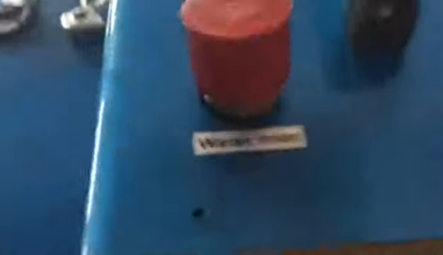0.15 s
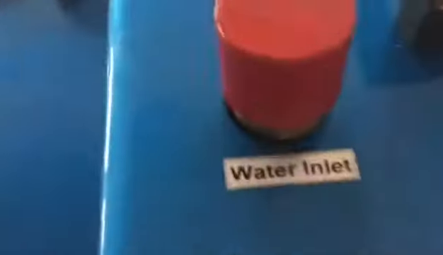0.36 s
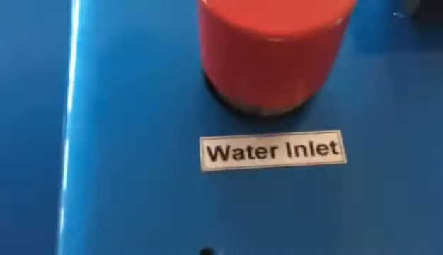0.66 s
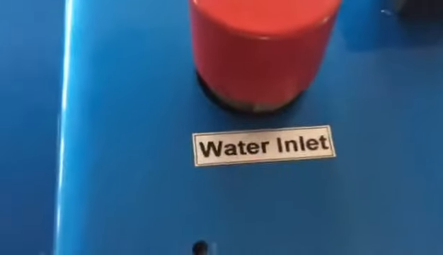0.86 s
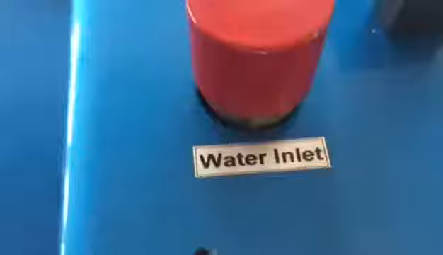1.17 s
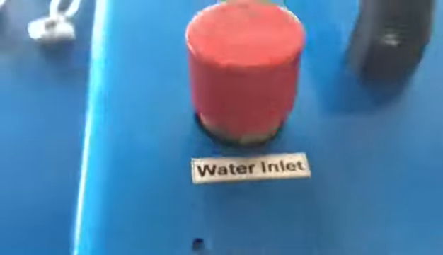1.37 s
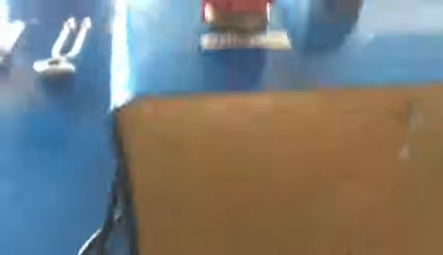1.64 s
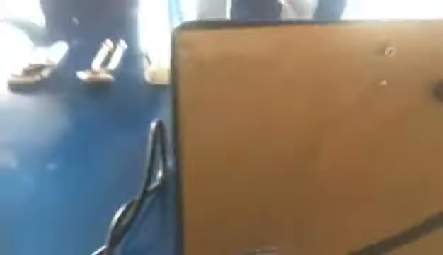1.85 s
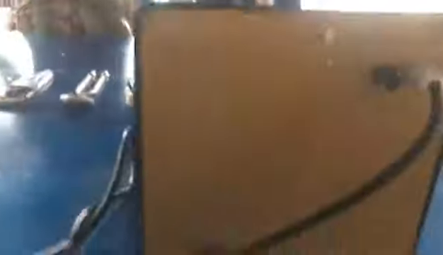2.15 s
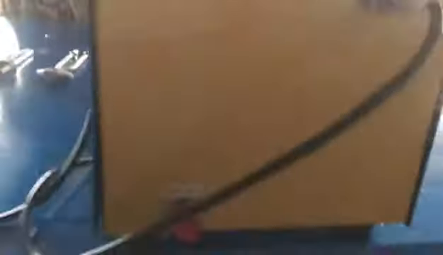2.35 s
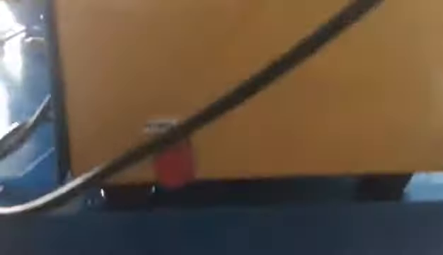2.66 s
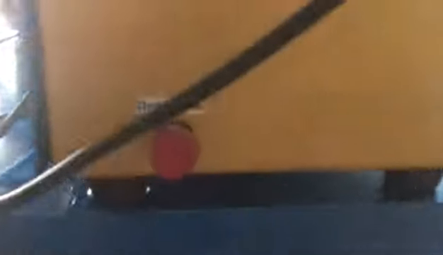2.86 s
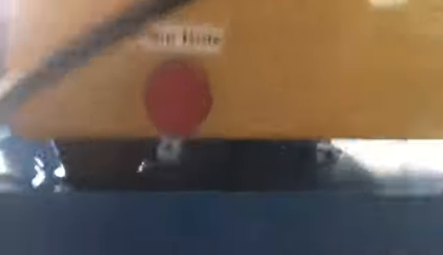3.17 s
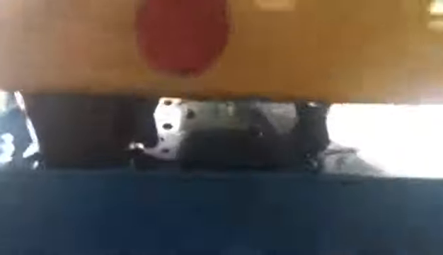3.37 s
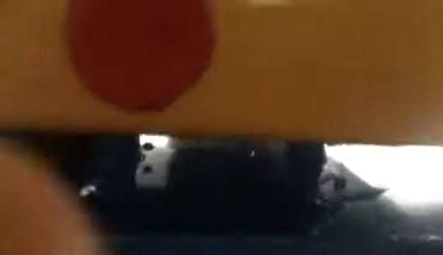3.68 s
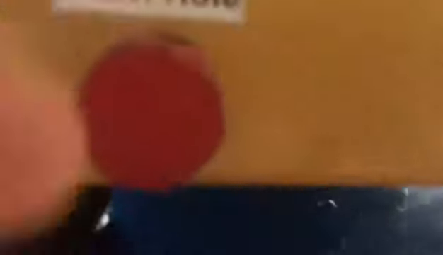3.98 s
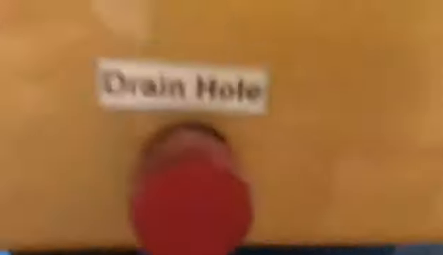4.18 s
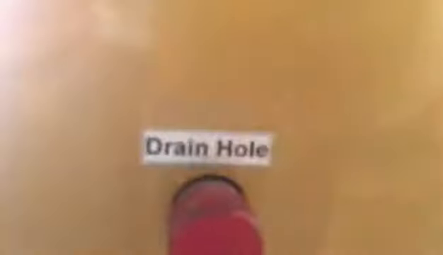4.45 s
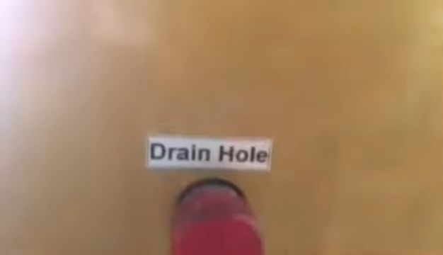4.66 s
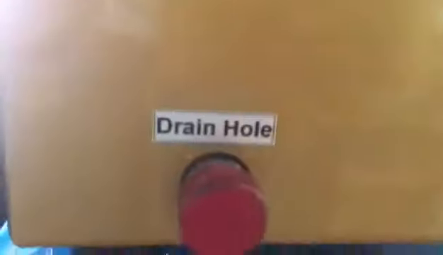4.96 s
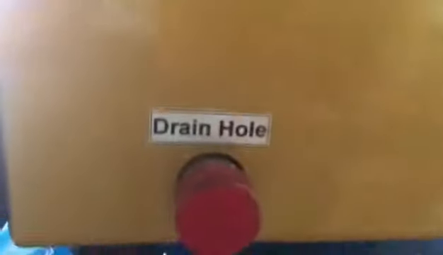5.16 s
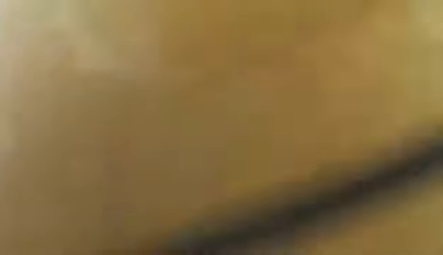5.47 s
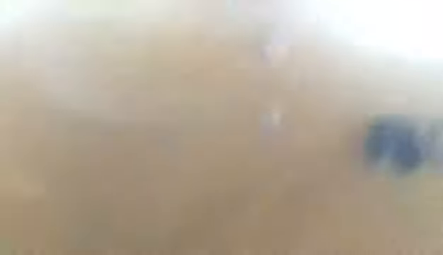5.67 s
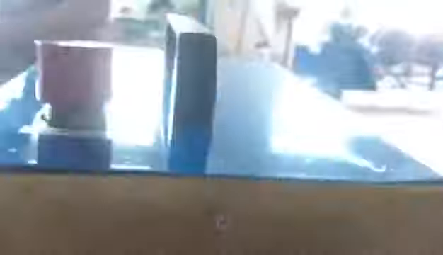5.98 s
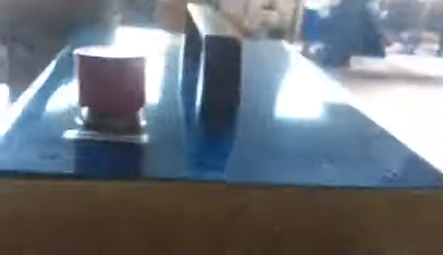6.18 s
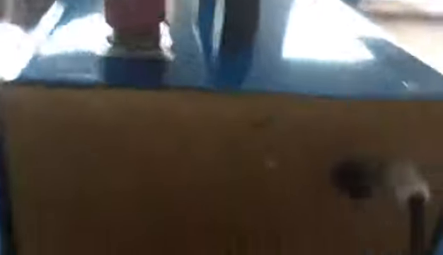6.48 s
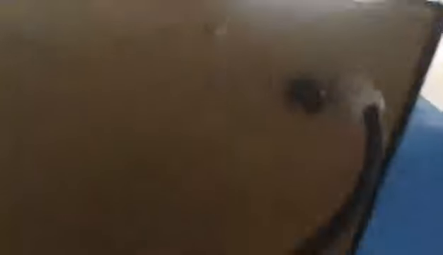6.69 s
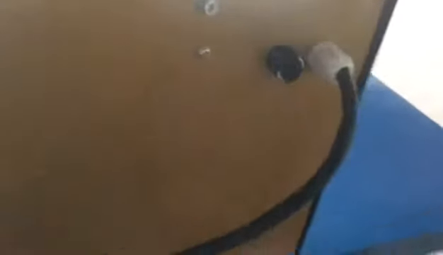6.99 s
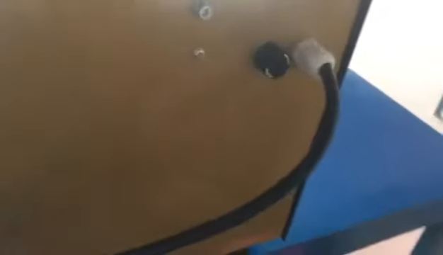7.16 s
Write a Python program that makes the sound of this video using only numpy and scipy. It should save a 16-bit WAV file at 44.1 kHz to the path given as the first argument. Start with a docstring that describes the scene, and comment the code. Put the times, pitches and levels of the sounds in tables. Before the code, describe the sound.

Steady hum and airy whir of a workshop machine, its whine swelling and fading, broken by a light metallic clink and a dull bump.

```python
"""An induction heater's cooling unit

A fan drones on a workshop bench, air rushes through the vents and a pump hums. As the microphone
moves around the steel case, the fan's whining overtones swell and fade, and the air rings.
Small metal parts clink, something hisses briefly, a hand knocks softly near the microphone,
and a far tone hoots."""
import sys
import numpy as np
from scipy import signal
from scipy.fft import rfft, irfft, next_fast_len
from scipy.io import wavfile
from scipy.ndimage import map_coordinates

SR = 44100
rng = np.random.default_rng(int(sys.argv[2]) if len(sys.argv) > 2 else 0)


def unload_wav(signal):
    """Save mono or channel-first audio to the path in sys.argv[1] as 16-bit WAV at rate SR, clipped to [-1, 1]."""
    wavfile.write(
        sys.argv[1],
        SR,
        np.round(np.clip(np.atleast_2d(signal).T, -1, 1) * 32767).astype(np.int16),
    )


N = 323253

# how often a blade passes, the mains power ripples and a second rotor shakes
BLADE_HZ, MAINS_HZ, SHAKE_HZ = 213.12, 100, 43.3

# Below, relative_db is a level that is scaled later, and fade_s is the time to die away by 60 dB.
# the fan's lowest note: time_s, level_db
DRONE_LEVEL = [(0, -27.5), (.25, -26), (.85, -25.5), (1.5, -26.5), (2.15, -29), (3.6, -27.5), (4.5, -27),
               (5.6, -27), (6.25, -28.5), (6.7, -27.2)]
# the whine above that note: blade_multiple, relative_db, gain_db_per_nearness_db
OVERTONES = [(2, -48.5, 0.5), (3, -45, 1.1), (4, -40.5, 2.06), (5, -34, 0.5), (6, -40.5, 0.5),
             (7, -49, 0.5), (8, -50.5, 0.7), (9, -65.5, -1.5), (11, -63, 2), (12, -54, 1)]
# spots where an overtone cancels: time_s, blade_multiple, half_width_s, depth_db
QUIET_SPOTS = [(0, 3, 0.28, -20), (.55, 5, 0.76, -5.5), (.7, 6, 0.75, -6.5), (1.1, 2, 0.92, -18),
               (1.55, 3, 0.27, -20), (1.84, 5, 0.37, -9), (2.37, 5, 0.32, -26), (2.4, 8, 0.81, -25),
               (2.7, 4, 0.44, -3.5), (2.94, 6, 0.33, -29), (3.1, 7, 1.1, -13), (3.7, 2, 0.36, -7),
               (4.9, 6, 0.54, -5), (5.5, 6, 0.11, -6), (5.6, 8, 0.16, -14), (5.75, 5, 0.12, -4),
               (5.88, 7, 0.38, -5), (5.9, 4, 0.38, -24), (7.2, 2, 0.44, -12), (7.2, 5, 2.9, -13.5)]
# weak tones beside the fan's own: blade_multiple, mains_steps, shake_steps, relative_db
SIDE_TONES = [(1, 0, 1, -53), (2, 0, -1, -63), (3, 0, 1, -55.5), (3, 1, 0, -61), (4, 0, -1, -56),
              (4, 0, 1, -57), (4, 1, 0, -57), (5, -1, -1, -58), (5, -1, 0, -57), (5, 0, -1, -60.5),
              (5, 0, 1, -59.5), (5, 1, -2, -61), (6, -1, -1, -57), (6, 1, 0, -67), (7, 0, -1, -58),
              (7, 0, 1, -60.5), (7, 1, 0, -54), (8, -1, -1, -59.5), (8, 1, 0, -62), (10, 1, 0, -59.5)]
# how the blades' pulses swell and shrink: mains_steps, shake_steps, relative_db
BEATS = [(0, 1, 1.5), (1, 0, 0), (1, 1, -4), (1, -1, -5), (1, -2, -3.5), (0, 2, -8.5)]
# how near the microphone is to the fan's outlet (higher is nearer): time_s, nearness_db
NEARNESS = [(0, -2.5), (.8, 0), (1.4, -1), (1.8, -2.5), (2.5, -4.5), (3.4, 1.4), (3.9, 2), (4.5, -1),
            (5.35, 1), (5.75, -6), (7.33, -7)]
# the microphone's path around the case: time_s, distance_cm
MIC_PATH = [(0, 0), (.55, 10), (1.35, 11), (2.7, 30), (4.35, 58), (5.3, 60), (6.2, 80), (7.33, 90)]

# the four bands of air noise, from low to high: frequency_hz, relative_db
RUMBLE_COLOUR = [(10, -52), (25, -6), (40, -4), (55, 5.5), (90, 2.5), (160, -0.5), (260, 2), (330, -13),
                 (500, -18.5), (900, -48)]
RUSH_COLOUR = [(150, -44), (300, -1.5), (400, -2.5), (650, -1.5), (780, -2.5), (980, 2.5), (1130, -2),
               (1215, -3.5), (1350, -2), (1550, -4.5), (2000, -6.5), (2300, -4.5), (2470, -7), (2600, -6.5),
               (2850, -11.5), (4000, -47)]
HISS_COLOUR = [(2500, -52), (2850, -5), (3150, 1), (3700, 0), (4400, -7), (5100, -10.5), (5700, -7.5),
               (6500, -5), (7200, -14.5), (9000, -45)]
SIZZLE_COLOUR = [(6200, -27), (7200, 0.5), (7900, 6), (8800, 3), (9450, 7.5), (10300, -8.5), (11000, 0.5),
                 (11800, 1), (12700, -4), (14000, -11)]
# how loud three of those bands are: time_s, level_db
RUMBLE_LEVEL = [(.25, -38), (.7, -41.5), (2.2, -43.5), (2.8, -42), (3.85, -41), (3.98, -45), (4.15, -38.5),
                (4.7, -42), (5.6, -39), (6.2, -43.5), (6.7, -39)]
RUSH_LEVEL = [(0, -43.5), (.3, -39.5), (1.4, -41.5), (1.8, -42.5), (2.4, -42.5), (2.7, -42.5), (3.2, -42),
              (3.8, -39), (4.6, -41), (5.4, -42), (7.33, -42)]
SIZZLE_LEVEL = [(0, -62.5), (1.2, -63.5), (1.9, -61.5), (2.4, -61), (3.1, -57.5), (4.1, -57), (5.3, -58.5),
                (5.7, -58.5), (6.15, -61), (6.8, -61), (7.33, -61)]
# where the air rings at each part of the case: pitch_hz, half_width_hz, relative_db
LID = [(1030, 114, -46), (1320, 41, -48), (1566, 50, -50), (1865, 27, -58.5), (2380, 76, -48.5),
       (3190, 70, -59), (6700, 130, -64)]
HANDLE = [(1570, 60, -54), (3170, 61, -49.5), (4120, 150, -58)]
RIM = [(950, 45, -51), (1590, 55, -47.5), (2240, 35, -55), (2600, 40, -55.5), (3170, 70, -64),
       (4010, 33, -61)]
EDGE = [(2220, 89, -47), (6300, 440, -59)]
UNDERSIDE = [(1830, 72, -45), (2550, 46, -49), (3140, 190, -48.5)]
PANEL = [(662, 90, -46.5), (1060, 170, -45), (9500, 92, -69)]
DRAIN = [(1480, 71, -42.5), (1700, 37, -53), (2300, 55, -47.5), (3770, 250, -58), (6360, 92, -56.5),
         (7770, 220, -61), (12000, 130, -75)]
CORNER = [(89, 23, -47.5), (152, 12, -52.5), (930, 54, -53.5), (1526, 66, -47), (2160, 29, -54.5),
          (2654, 33, -55.5), (3180, 130, -60)]

# a thin fan whine and a broad, bright hiss near the end: pitch_hz, half_width_hz, relative_db
LATE_WHINE_AND_HISS = [(1560, 30, -45.5), (7000, 2500, -55), (11800, 700, -61)]
CABLE = LATE_WHINE_AND_HISS  # names only the microphone's last stop, where these are heard
# when each of those sets of bands is heard: start_s, end_s, band_table
BAND_TIMES = [(-.5, 0.33, HANDLE), (-.5, 1.6, LID), (1.5, 2.38, RIM), (2.65, 3.3, EDGE), (2.8, 5.6, PANEL),
              (3.3, 4.27, UNDERSIDE), (4.1, 5.61, DRAIN), (5.6, 8.9, CORNER), (7.0, 7.7, CABLE)]
# the low hum of the pump and case: pitch_hz, level_db
PUMP_HUM = [(64.7, -54.5), (118.4, -54), (153.4, -57)]

# metal parts touching: start_s, relative_db, brightness_db_per_octave
CLINKS = [(2.04, -43, 5), (2.049, -32.5, -8), (2.0549, -43.5, 3), (2.0579, -33, -5), (2.062, -40, -1),
          (2.077, -41.5, 2), (2.085, -42, 5)]
# the notes the metal rings at: pitch_hz, relative_db, fade_s
METAL_NOTES = [(3286, -1.5, 0.082), (3840, 1, 0.07), (4100, -4, .06), (4630, -5, 0.06), (5840, -11, .07),
               (6470, -5.5, 0.08), (7100, -8.5, 0.093), (9970, -15, 0.08)]
# a light tap on another part, and its bounce: start_s, pitch_hz, level_db, fade_s
TAPS = [(2.596, 3530, -33, 0.06), (2.598, 7300, -48, .07), (2.604, 5900, -44, .045)]
# brief hisses: start_s, relative_db, rise_s, fade_s, brightness_db_per_octave
SHORT_HISSES = [(0.516, -42, 0.013, 0.38, 2), (1.87, -44.5, 0.073, 1.0, 2), (2.035, -41, 0.016, 0.23, -1),
                (2.345, -44, 0.012, 0.12, 4)]
# the colour they share: frequency_hz, relative_db
SHORT_HISS_COLOUR = [(2800, -20), (4000, 11), (6000, 7), (9500, -4), (11500, 4), (14000, -1)]
# the hand's knocks: start_s, level_db, pitch_hz, fade_s
KNOCKS = [(3.616, -27, 232, .025), (3.825, -20, 490, .012), (3.829, -12.5, 310, .01),
          (3.831, -13, 105, .032)]
# the far hoot: time_s, pitch_hz, relative_db
HOOT = [(6.08, 458, -70), (6.19, 502, -51), (6.27, 486, -49), (6.34, 520, -45), (6.43, 450, -46),
        (6.54, 415, -70.5)]
# how long the workshop echoes: frequency_hz, fade_s
ROOM_FADE = [(200, 0.33), (3000, 0.16), (12000, 0.19)]


def fan(blades, nearness_db, flutter_db=0.27, jitter_cycles=0.016, whine_db=-0.5, side_follow=0.32):
    """Passing blades push the air, making a drone with whining overtones at multiples of its pitch."""
    def unsteady_tone(multiple):
        """Uneven incoming air shakes the level and timing, more so for higher tones."""
        flutter = amp(flutter_db * np.sqrt(multiple) * wobble(16))
        return flutter * tone(multiple * blades + jitter_cycles * np.log(multiple) * wobble(11))

    out = amp(curves(DRONE_LEVEL)[0]) * unsteady_tone(1)
    for multiple, db, follow in OVERTONES:
        gain = amp(db + whine_db + follow * nearness_db) * quiet_spots(multiple)
        out += gain * unsteady_tone(multiple)
    # the mains ripple and the shaking second rotor add tones on either side
    for multiple, mains, shake, db in SIDE_TONES:
        gain = amp(db + side_follow * nearness_db + 1.5 * wobble(1.5))
        out += gain * tone(multiple * blades + beat(mains, shake))
    return out


def quiet_spots(overtone):
    """An overtone's gain dips where the microphone crosses a spot in which its waves cancel."""
    gain, t = np.ones(N), clock()
    for time_s, multiple, half_width_s, depth_db in QUIET_SPOTS:
        if multiple == overtone:
            away = ((t - time_s) / half_width_s) ** 2
            gain *= np.sqrt((away + amp(depth_db) ** 2) / (away + 1))
    return gain


def beat(mains_steps, shake_steps):
    """Cycles so far of a throb made from the mains ripple and the rotor's shake."""
    return (mains_steps * MAINS_HZ + shake_steps * SHAKE_HZ) * clock()


def blade_buzz(blades, level_db=-66, db_per_octave=-9, wander_db=3, first=15, count=20):
    """Faint, high blade overtones stay in step, while each comes and goes on its own."""
    out = np.zeros(N)
    for multiple in range(first, first + count):
        db = level_db + db_per_octave * np.log2(multiple / first) + wander_db * wobble(1.31)
        out += amp(db) * np.sqrt(2) * np.cos(2 * np.pi * multiple * blades)
    return out


def blade_flow(blades, pulse_db=-14, narrowness=220):
    """Return a function that makes airflow: each blade gives a sharp pulse and a puff of fresh noise."""
    passing = np.cos(2 * np.pi * blades) - 1
    spikes = np.exp(narrowness * passing)
    whir = np.zeros(N)
    # each throb leaves the case by its own paths, so together they whir smoothly
    for mains, shake, db in BEATS:
        throb = amp(db) * np.cos(2 * np.pi * (beat(mains, shake) + rng.random()))
        whir += scattered(throb * spikes, spread_hz=250)
    pulses = amp(pulse_db) * unit(whir)
    puffs = unit(np.exp(.5 * passing))
    return lambda: pulses + puffs * rng.standard_normal(N)


def vent_air(blades, flow, nearness_db, hiss_db=-50.5, chop=0.096, shake=0.12):
    """Swirling air rumbles, rushes, hisses and sizzles; the blades chop all but the rumble into puffs."""
    puff = np.exp(3 * np.cos(2 * np.pi * blades))
    pulsing = chop * unit(puff - puff.mean()) + shake * tone(SHAKE_HZ * clock())
    rumble = amp(curves(RUMBLE_LEVEL)[0] + 0.06 * wobble(11)) * noise(RUMBLE_COLOUR)
    vent_flow = filtered(flow(), lambda hz: amp(along(RUSH_COLOUR, hz)))
    rush = amp(curves(RUSH_LEVEL)[0]) * dips_and_peaks(vent_flow, ripple_db=6.5)
    hiss_gain = amp(hiss_db + 0.2 * nearness_db + 1.3 * wobble(11))
    hiss = hiss_gain * dips_and_peaks(noise(HISS_COLOUR))
    sizzle_gain = amp(curves(SIZZLE_LEVEL)[0] + 1.66 * wobble(17))
    sizzle = sizzle_gain * dips_and_peaks(noise(SIZZLE_COLOUR))
    return rumble + rush + (hiss + sizzle) * (1 + pulsing)


def airflow_bands(flow, blend_s=0.44, gain_db=-3.0):
    """The air rings at each part the microphone passes; a thin whine and bright hiss join near the end."""
    out, t = np.zeros(N), clock()
    for start_s, end_s, bands in BAND_TIMES:
        fade = np.clip(.5 + np.minimum(t - start_s, end_s - t) / blend_s, 0, 1)
        for pitch_hz, half_width_hz, db in bands:
            band = filtered(flow(), lambda hz: 1 / (1 + ((hz - pitch_hz) / half_width_hz) ** 2))
            out += amp(db + gain_db) * fade * unit(band)
    return out


def dips_and_peaks(x, ripple_db=4.5, width_hz=85, spacing_cm=9):
    """Fine dips and peaks colour the hiss, shifting as the microphone moves."""
    hz, t, spectrum = signal.stft(x, SR, nperseg=2048)
    distance_cm = np.interp(t, *np.transpose(MIC_PATH))
    grid = np.meshgrid(hz / width_hz, distance_cm / spacing_cm, indexing="ij")
    pattern = map_coordinates(rng.standard_normal((512, 32)), grid, order=2, mode="mirror")
    pattern = np.minimum(pattern, np.tanh(pattern))  # deep dips, low peaks
    depth_db = ripple_db * np.clip(hz / 6000, 0, 1)[:, None]  # strongest in the treble
    rippled = signal.istft(spectrum * amp(depth_db * pattern), SR, nperseg=2048)[1]
    return unit(rippled[:N])


def scattered(x, spread_hz=500):
    """Paths of different length through the case shift each band by a millisecond or so."""
    turns = .3 * rng.standard_normal(128)
    steps = np.arange(len(turns))
    return filtered(x, lambda hz: np.exp(2j * np.pi * np.interp(hz / spread_hz, steps, turns)))


def pump(waver_db=2, drift_cycles=0.062):
    """The pump and case hum low and a little unsteadily."""
    return sum(amp(db + waver_db * wobble(2.71)) * tone(hz * clock() + drift_cycles * wobble(2.91))
               for hz, db in PUMP_HUM)


def clinks(ring_db=-2.5, crack_db=1, crack_fade_s=0.011, tap_crack_db=-12):
    """Metal parts touch with a short crack and a rough ring; the light tap pings more purely."""
    out, t = np.zeros(N), np.arange(SR // 4) / SR

    def ping(hz, db, fade_s, roughness):
        """One dying note, roughened by random slips in its timing."""
        slips = roughness * np.cumsum(rng.standard_normal(len(t)))
        return amp(db - 60 * t / fade_s) * np.sin(2 * np.pi * hz * t + slips)

    crack_noise = noise([(2400, -24), (3300, 3), (4300, 11), (5300, -4), (7200, 1), (9000, -10),
                         (14000, -17)])  # frequency_hz, relative_db
    for start_s, db, brightness in CLINKS:
        ring = np.zeros(len(t))
        for hz, note_db, fade_s in METAL_NOTES:
            tilt_db = brightness * np.log2(hz / METAL_NOTES[0][0])
            ring += ping(hz, note_db + rng.normal(0, 2) + tilt_db, fade_s, roughness=0.12)
        crack = crack_noise[round(start_s * SR):][:len(t)] * amp(crack_db - 60 * t / crack_fade_s)
        add(out, start_s, amp(db) * (amp(ring_db) * ring + crack))
    for start_s, hz, db, fade_s in TAPS:
        crack = crack_noise[:len(t)] * amp(db + tap_crack_db - 60 * t / fade_s)
        add(out, start_s, ping(hz, db, fade_s, roughness=0.06) + crack)
    return out


def short_hisses():
    """Thin bursts of noise swell and die away."""
    out, t = np.zeros(N), np.arange(SR // 2) / SR
    lowest_hz = SHORT_HISS_COLOUR[0][0]
    for start_s, db, rise_s, fade_s, brightness in SHORT_HISSES:
        colour = [(hz, level + brightness * np.log2(hz / lowest_hz)) for hz, level in SHORT_HISS_COLOUR]
        swell = amp(db - 60 * t / fade_s) * (1 - np.exp(-t / rise_s))
        add(out, start_s, swell * noise(colour)[:len(t)])
    return out


def hand_knocks(rise_s=0.00046):
    """A hand knocks softly; each low note dies within a few cycles."""
    out, t = np.zeros(N), np.arange(SR // 8) / SR
    for start_s, db, hz, fade_s in KNOCKS:
        swell = amp(db - 60 * t / fade_s) * (1 - np.exp(-t / rise_s))
        add(out, start_s, swell * np.sin(2 * np.pi * hz * t))
    return out


def far_hoot(direct_db=-2, echo_db=-11):
    """A soft tone rises and falls, blurred by the room."""
    hz, db = curves(HOOT)
    sounding = (clock() > HOOT[0][0]) & (clock() < HOOT[-1][0])
    call = amp(db) * sounding * tone(np.cumsum(hz) / SR)
    return amp(direct_db) * call + amp(echo_db) * room_echo(call)


def room_echo(x):
    """The workshop's echo is a short tail in which low sounds last longest."""
    hz, t, spectrum = signal.stft(rng.standard_normal(SR // 2), SR, nperseg=256)
    fading = amp(-60 * t / along(ROOM_FADE, hz)[:, None])
    tail = signal.istft(spectrum * fading, SR, nperseg=256)[1]
    return signal.fftconvolve(x, tail / np.linalg.norm(tail))[:N]


def amp(db):
    """Turn decibels into a gain to multiply by."""
    return 10 ** (np.asarray(db) / 20)


def unit(x):
    """Scale x to an average strength (rms) of 1."""
    return x / np.sqrt(np.mean(x ** 2) + 1e-20)


def clock():
    """The time of each sample, in seconds."""
    return np.arange(N) / SR


def along(points, hz):
    """Read between the rows of a (frequency_hz, value) table, with octaves evenly spaced."""
    frequencies, values = np.transpose(points)
    return np.interp(np.log(hz + 1), np.log(frequencies + 1), values)


def curves(rows):
    """Give each column after the time one value per sample."""
    times, *columns = np.transpose(rows)
    return [np.interp(clock(), times, column) for column in columns]


def wobble(rate_hz):
    """A smooth curve through rate_hz random values a second."""
    values = rng.standard_normal(int(N * rate_hz / SR) + 4)
    times = np.linspace(0, N / SR, 2048)
    return np.interp(clock(), times, map_coordinates(values, [times * rate_hz]))


def filtered(x, response):
    """Multiply each frequency in x by response(hz)."""
    size = next_fast_len(N + SR // 4)
    return irfft(rfft(x, size) * response(np.fft.rfftfreq(size, 1 / SR)), size)[:N]


def noise(colour):
    """Noise of strength 1, shaped by a (frequency_hz, relative_db) table."""
    return unit(filtered(rng.standard_normal(N), lambda hz: amp(along(colour, hz))))


def tone(cycles):
    """A sine wave of strength 1 that starts anywhere in its cycle."""
    return np.sqrt(2) * np.sin(2 * np.pi * (cycles + rng.random()))


def add(track, start_s, sound):
    """Mix a sound into the track at start_s."""
    part = track[round(start_s * SR):][:len(sound)]
    part += sound[:len(part)]


def scene(drift_hz=0.202, tremble_hz=.15, echo_db=-17.0):
    """The running machine, with small noises around it."""
    blade_hz = BLADE_HZ + drift_hz * wobble(2.5) + tremble_hz * wobble(7)
    blades = np.cumsum(blade_hz) / SR  # how many blades have passed so far
    nearness_db, = curves(NEARNESS)
    flow = blade_flow(blades)
    tones = fan(blades, nearness_db) + blade_buzz(blades)
    air = vent_air(blades, flow, nearness_db) + airflow_bands(flow)
    machine = scattered(tones + air) + pump()
    metal = clinks()
    background = metal + amp(echo_db) * room_echo(metal) + short_hisses() + hand_knocks() + far_hoot()
    return (machine + background)[None]


def record(dry, low_cut_hz=38, top_hz=14200):
    """The microphone loses the deepest bass and keeps nothing above top_hz."""
    bass_cut = signal.butter(4, low_cut_hz, "highpass", fs=SR, output="sos")
    thinned = signal.sosfilt(bass_cut, dry[0])
    return filtered(thinned, lambda hz: hz < top_hz)[None]


dry = scene()
out = record(dry)
unload_wav(out)
```